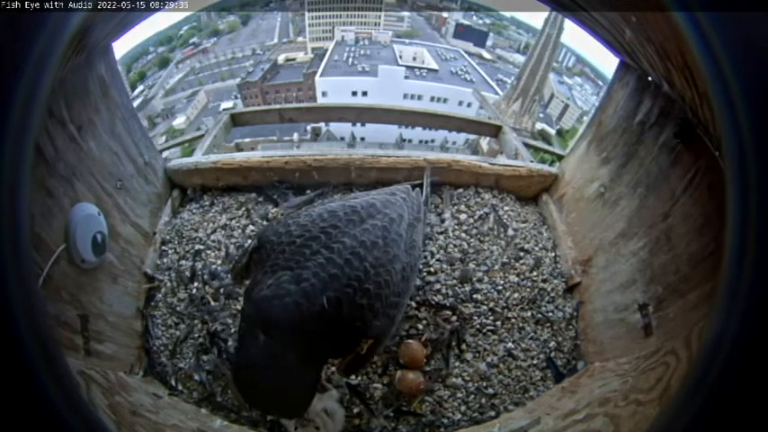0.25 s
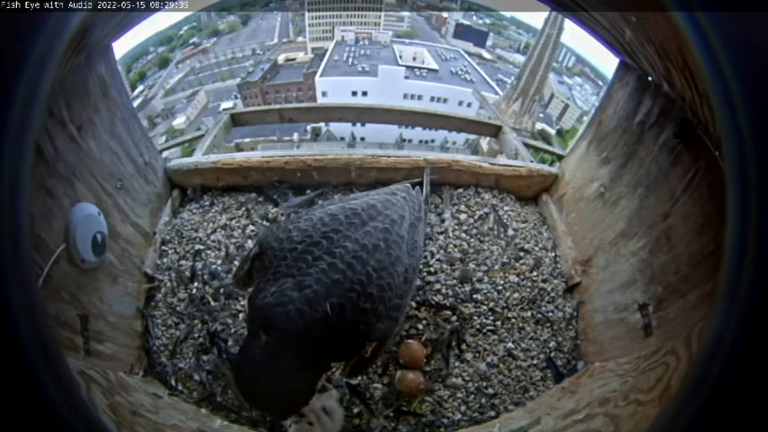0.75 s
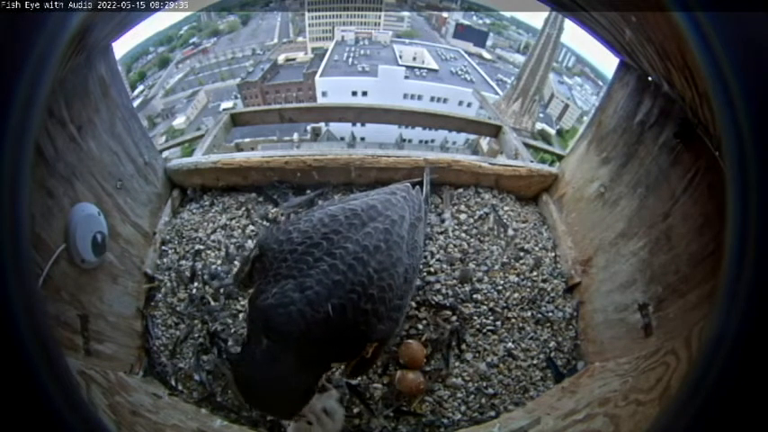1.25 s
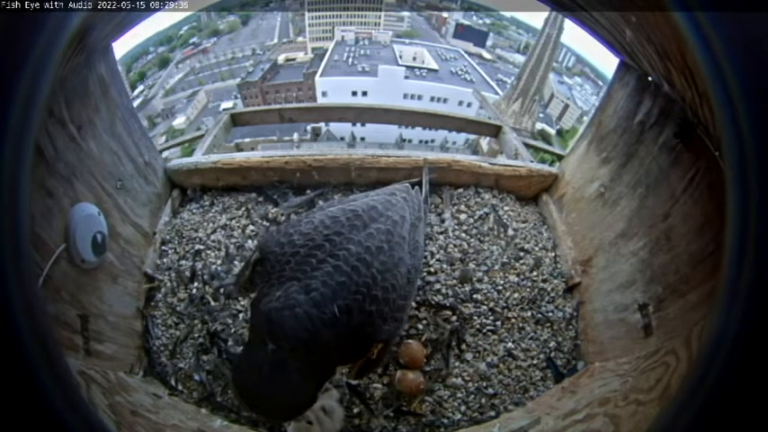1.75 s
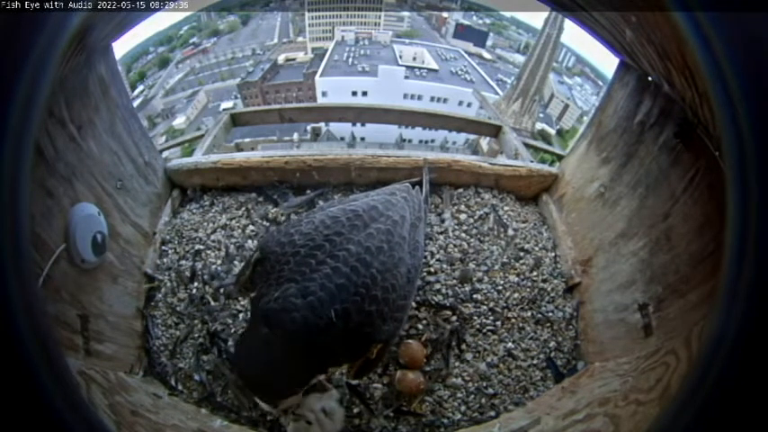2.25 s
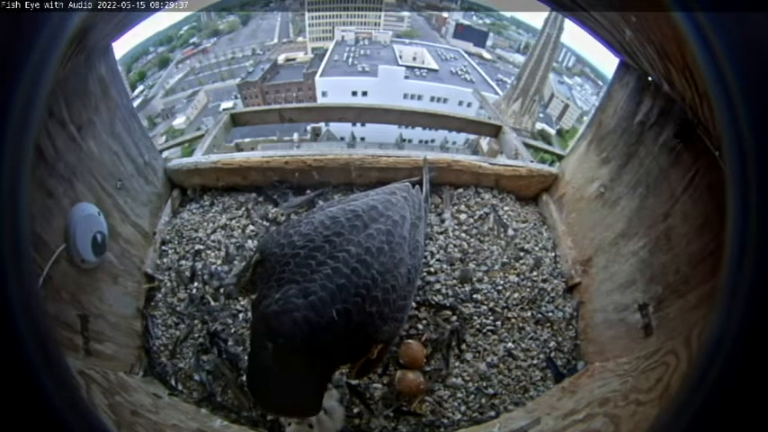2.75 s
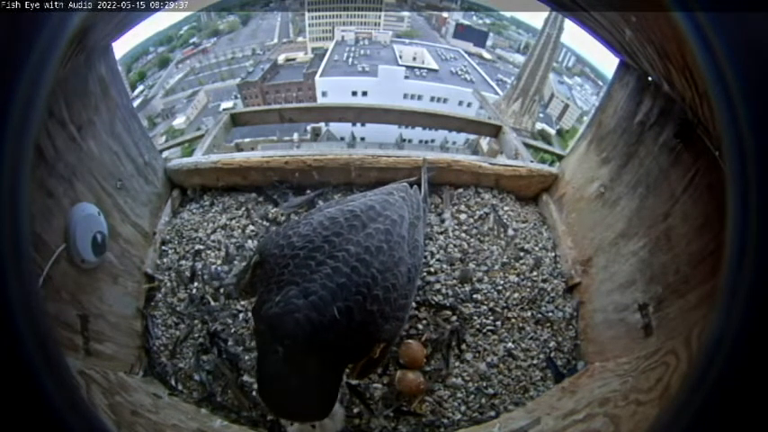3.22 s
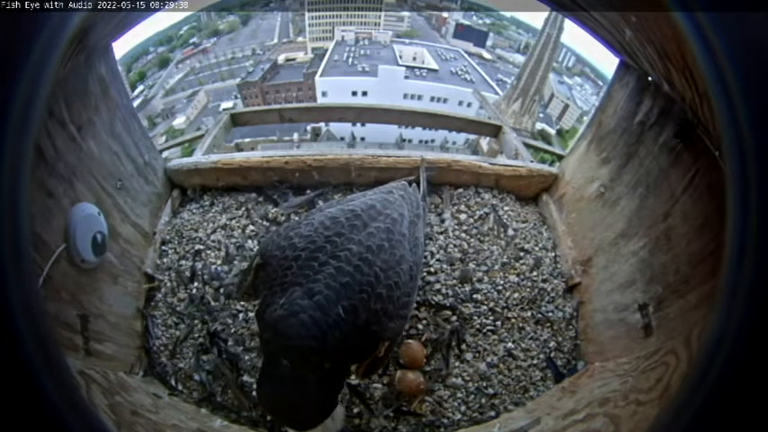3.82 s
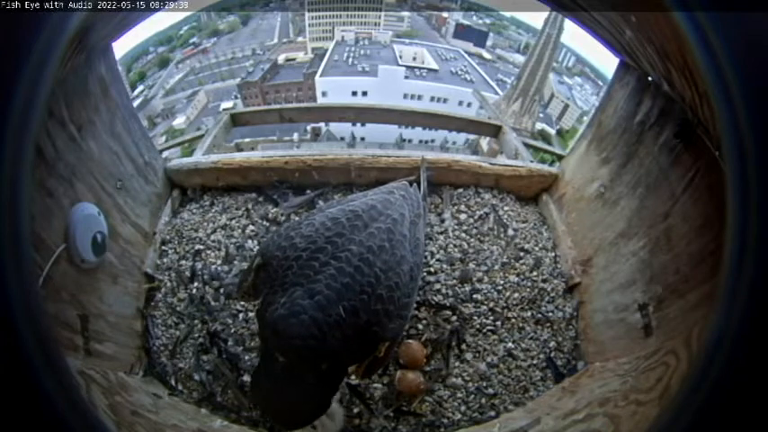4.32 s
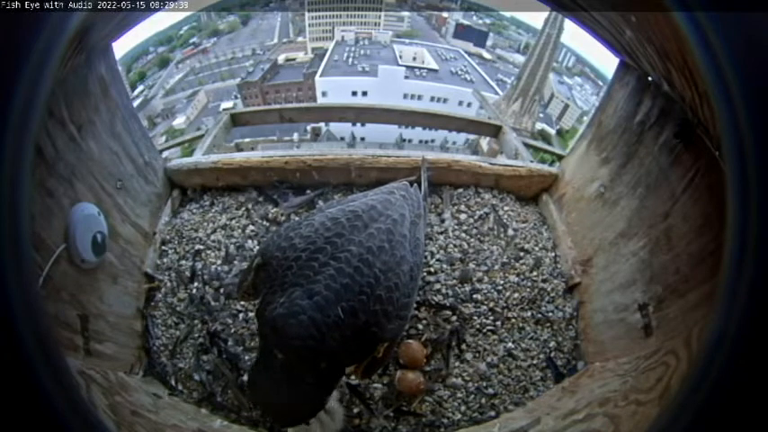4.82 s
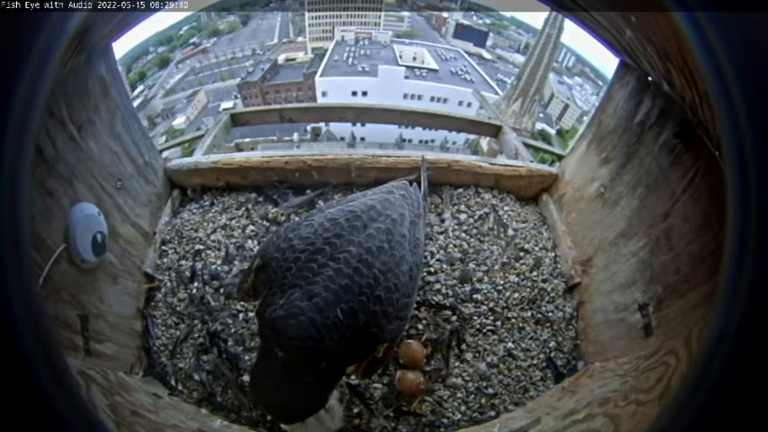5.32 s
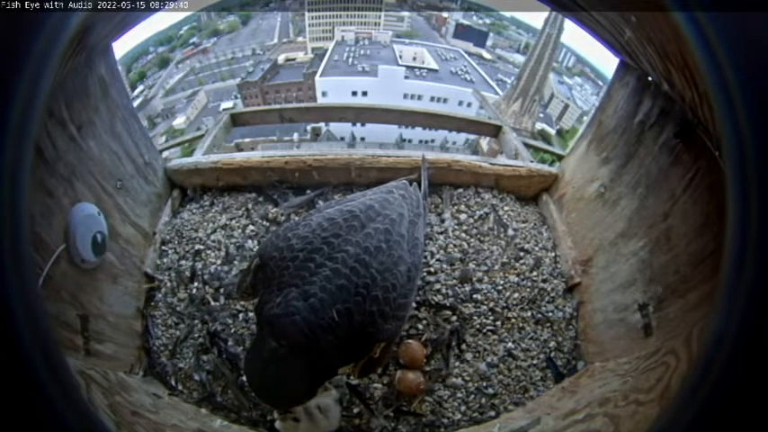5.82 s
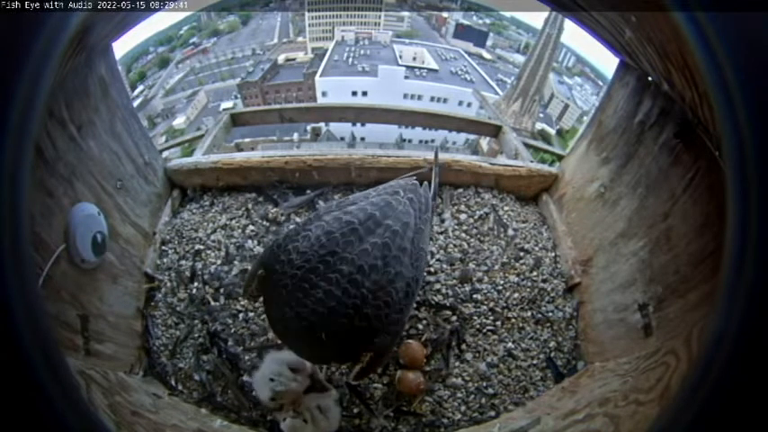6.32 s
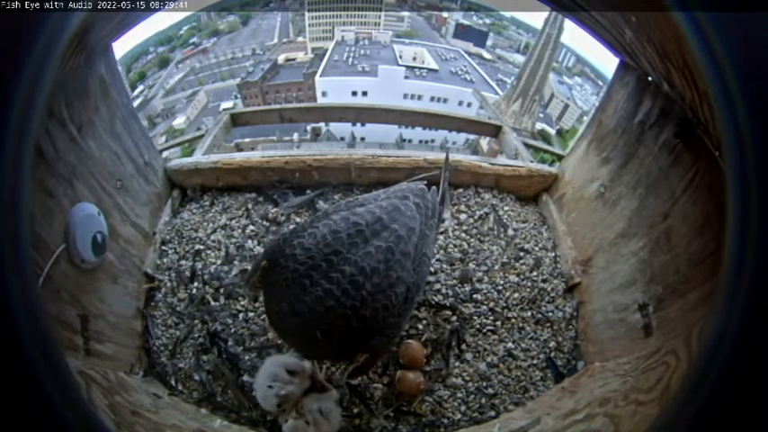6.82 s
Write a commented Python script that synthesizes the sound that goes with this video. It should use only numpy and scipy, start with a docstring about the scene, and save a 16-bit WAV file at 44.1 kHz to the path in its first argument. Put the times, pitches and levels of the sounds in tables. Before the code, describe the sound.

Falcon chicks whine and squeal thinly in a wooden nest box over a low city rumble, with a few clicks on gravel.

```python
"""Falcon chicks beg under a parent in a wooden, gravel-floored nest box on a roof.
Each cry is a reedy syrinx tone: thin whines glide, quiver and break into squeals, rasping under strain.
A second voice cuts in with a croak and later a screech. Beak and claws click on the gravel and knock
the floor, and the plywood walls add a short ring. Behind it all, a bed of city rumble and ventilation
hum comes through the opening."""
import sys
import numpy as np
from scipy import signal
from scipy.fft import rfft, irfft, next_fast_len
from scipy.io import wavfile
from scipy.ndimage import map_coordinates

SR = 44100
rng = np.random.default_rng(int(sys.argv[2]) if len(sys.argv) > 2 else 0)


def bounce(signal):
    """Save signal as a 16-bit WAV file at the path given by the first command-line argument."""
    frames = np.transpose(np.atleast_2d(signal))
    limited = np.clip(frames, -1, 1)
    pcm = np.round(limited * 32767).astype(np.int16)
    wavfile.write(sys.argv[1], SR, pcm)


N = 311346
TIME = np.arange(N) / SR

# six whines, a long swooping squeal, then the second voice's croak and screech:
# (start [s], end [s], fundamental [dB], overtones [dB], flat start [share of pitch], closing fall [s])
CRIES = [(1.299, 2.444, -54, -72.5, 0.06, 0.06), (2.78, 2.88, -55.5, -73.5, 0.12, 0.0),
         (3.04, 3.806, -49, -68, 0.24, 0.025), (3.889, 4.094, -46, -57, 0.0017, 0.0),
         (4.121, 4.737, -50, -63.5, 0.16, 0.0), (5.07, 5.82, -49, -62, 0.35, 0.0),
         (5.961, 7.06, -48, -61, 0.16, 0.0), (4.406, 4.602, -52.0, -57, 0.0059, 0.0),
         (5.998, 6.089, -44, -61, 0.05, 0.0)]
# the pitch line each cry aims at, one list per cry: (time [s], pitch [Hz])
PITCH_LINES = [
    [(1.42, 1535), (1.51, 1485), (1.62, 1690), (1.82, 1895), (1.88, 1878), (2.04, 2022), (2.29, 1975),
     (2.38, 2025)],
    [(2.8, 1890), (2.846, 1990), (2.88, 1920)],
    [(3.11, 1990), (3.22, 1946), (3.3, 1972), (3.55, 2008), (3.7, 1987), (3.78, 1945)],
    [(3.887, 1720), (3.915, 1664), (3.935, 1710), (3.955, 1650), (3.994, 1770), (4.042, 1733),
     (4.058, 1640), (4.08, 1680), (4.092, 1600)],
    [(4.145, 1810), (4.179, 1895), (4.201, 1705), (4.23, 1675), (4.25, 1745), (4.51, 1795), (4.55, 1745),
     (4.67, 1734), (4.704, 1635), (4.734, 1725)],
    [(5.17, 1755), (5.196, 1685), (5.22, 1740), (5.38, 1795), (5.43, 1872), (5.58, 1895), (5.666, 1800),
     (5.71, 1830), (5.82, 1812)],
    [(5.96, 2020), (6.033, 2235), (6.084, 2230), (6.115, 1985), (6.19, 1985), (6.245, 1925), (6.284, 2066),
     (6.346, 1890), (6.385, 1520), (6.412, 1735), (6.435, 1660), (6.49, 2035), (6.53, 2040), (6.58, 1770),
     (6.632, 1660), (6.651, 1762), (6.682, 1370), (6.71, 1730), (6.744, 1915), (6.806, 1535), (6.891, 1425),
     (6.904, 1255), (6.965, 1225), (6.995, 1665), (7.023, 1841), (7.06, 1760)],
    [(4.405, 1277), (4.424, 1150), (4.447, 1250), (4.47, 1125), (4.497, 1210), (4.516, 1373), (4.565, 1434)],
    [(6.023, 2470), (6.075, 2400)],
]
# spells in which the voice is pressed harder or cracks:
# (time [s], half length [s], fundamental [dB], overtones [dB], hoarseness [0-1])
STRAINS = [(1.345, 0.016, 8.5, 1, 0.06), (1.44, 0.13, -4.0, -14, 0.5), (1.87, 0.05, -12.0, -7, 0.3),
           (2.85, 0.027, 1, 6, 0.5), (3.06, 0.02, -11, 0, 0.4), (3.21, 0.05, -3.0, -2.0, 0.1),
           (4.02, 0.049, -1.5, 7.5, 0), (4.18, 0.035, -3.5, 8.5, 0.6), (4.5, 0.037, -1.5, 9, 0.35),
           (4.7, 0.05, 2.5, 1, 0.1), (5.09, 0.021, -14, 2, 0.9), (5.16, 0.037, -1.5, 14, 0.2),
           (5.5, 0.079, -5, -4.0, 0.1), (5.79, 0.074, 4, 8.5, 0.03), (6.05, 0.09, -7, 12, 0.3),
           (6.29, 0.033, -3, -2, 0.5), (6.36, 0.029, -3.5, -24, 0.02), (6.42, 0.021, -1, 12, 0.1),
           (6.68, 0.041, -0.5, 14.5, 0.35), (6.92, 0.05, -11, 14.0, 0.37)]
# balance of the voice's partials 2 to 5: (level [dB])
OVERTONE_TRIMS = [0.5, -4.5, -12.5, -26.5]
# throat and box resonances, lighting up each partial that glides through: (frequency [Hz], gain [dB])
THROAT_EQ = [(1200.0, 8.5), (1520.0, -4.5), (1670.0, 6), (1780.0, 4.5), (1880.0, -6.5), (2000.0, -3.0),
             (2350.0, -10), (3050.0, -5.5), (3500.0, -11.5), (4000.0, 0.5), (4450.0, 5), (4800.0, 4.0),
             (5100.0, 3), (5500.0, -1.0), (6000.0, 10.5), (6700.0, 4.5), (7400.0, -1.0)]
# beak and claws on gravel: (time [s], level [dB], floor knock [dB], mids [dB], contact hardness [Hz])
CLICKS = [(.2552, -42.5, 6, 13, 700), (.2838, -38.5, -6, 6.5, 900), (.428, -28.5, 4, -1.5, 372),
          (.672, -41, 5, -1, 550), (.7168, -39.5, -21, -3, 895), (.736, -39.5, -20, -9, 900),
          (.755, -42, -14, 4, 900), (0.7955, -12, -15.5, 0, 1500), (.8435, -42.5, -21, 16.5, 900),
          (1.2416, -42.5, -22, -14, 894), (1.3558, -42.5, -16, -4, 900), (1.381, -45, -6, 3, 900),
          (2.869, -51, -14, 5, 900), (4.9312, -39, -9, -13, 920), (5.3887, -39, -13, 3, 900),
          (5.412, -40.5, -23, 4, 900), (5.4296, -34, -18, 4.5, 900), (5.8536, -51, -19, 8, 875),
          (6.94, -51, -25, -8, 900)]
# tone colour of a struck pebble: (frequency [Hz], level [dB])
PEBBLE_SPECTRUM = [(600, -27.5), (1200, -13.5), (1650, -7), (2000, -13.5), (2250, -6.5), (2700, -14),
                   (3900, -15.5), (4700, -3.5), (5250, -11), (6100, -1.5), (6850, 0), (7500, -5),
                   (9000, -15), (12000, -83)]
# modes of the wooden floor: (frequency [Hz], level [dB], t60 [s])
FLOOR_MODES = [(257, -1, 0.012), (377, 2.5, 0.068), (524, -4.5, 0.063), (711, 7, 0.031), (784, 5, 0.036),
               (972, 1, 0.031), (1290, -8.5, 0.024)]
# ring time of the plywood walls: (frequency [Hz], t60 [s])
WALL_DECAY = [(200, 0.071), (2000, 0.09), (8000, 0.06)]
# low end of the traffic: (frequency [Hz], level [dB])
RUMBLE_SPECTRUM = [(15, -10.5), (28, -6.5), (45, -2.5), (65, 1.5), (113, -2), (150, -4), (180, -10.5),
                   (240, -7.5), (272, -26), (320, -28), (375, -20.5), (430, -30.5), (550, -64), (900, -120)]
# airy wash of the city: (frequency [Hz], level [dB])
WASH_SPECTRUM = [(180, -32), (300, -3.5), (327, -11), (366, -12.5), (441, -11.5), (638, -14.5), (778, -8),
                 (1060, -4), (1700, -17.5), (1830, -12.5), (1940, -16.5), (2200, -16.5), (2610, -23),
                 (6400, -31), (9000, -38), (11700, -98.5), (19800, -120)]
# the far engine works harder: (time [s], half length [s], boost [dB], speed change [share])
ENGINE_SURGES = [(.15, 0.36, 14, -0.012), (.85, 0.32, 14, -0.017), (5.3, 0.175, 11.5, 0.0536)]
# hum lines of the roof fans: (frequency [Hz], level [dB], width [Hz])
FAN_LINES = [(214, -61, 30), (254.5, -62, 8), (297.2, -65.5, 4), (379.8, -67.5, 15), (596.4, -74, 4),
             (896, -67, 4), (1160, -69.5, 25)]
# treble roll-off of the microphone: (frequency [Hz], gain [dB])
MICROPHONE_EQ = [(7250, -0.5), (7550, -9.5), (7850, -20.5), (9000, -18)]


def chicks(voice_db=-1):
    """The begging voices: every cry sung on its own pitch line."""
    out = np.zeros(N)
    for (start, end, tone_db, overtones_db, scoop, fall_s), line in zip(CRIES, PITCH_LINES):
        t = np.arange(start, end, 1 / SR)
        add(out, start, cry(t, glide(t, line, scoop, fall_s), tone_db, overtones_db))
    return amp(voice_db) * out


def cry(t, pitch, tone_db, overtones_db, waver=.004, clear_jitter=.0029, hoarse_jitter=.014,
        clear_rasp=.089, hoarse_rasp=1.05, shimmer_db=1.88, flutter_db=1.5, fade_s=.0035):
    """One side of a syrinx: a reedy, slightly wavering tone that turns bright or raspy under strain."""
    press_db, bright_db, hoarse = swells(STRAINS, t)
    jitter = clear_jitter + hoarse_jitter * hoarse
    rasp = clear_rasp + hoarse_rasp * hoarse
    pitch = pitch * (1 + waver * wobble(70, t))
    phase = 2 * np.pi * np.cumsum(pitch * (1 + jitter * wobble(600, t))) / SR
    partials_db = [tone_db + press_db] + [overtones_db + bright_db + db for db in OVERTONE_TRIMS]
    tone = np.zeros(len(t))
    for k, db in enumerate(partials_db, 1):
        # turbulence spreads a skirt of noise around each partial
        skirt = rasp * complex_wobble(900, t) / np.sqrt(2)
        gain = amp(db + along(THROAT_EQ, k * pitch) + shimmer_db * wobble(90.3, t))
        tone += gain * np.imag((1 + skirt) * np.exp(1j * k * phase))
    flutter = amp(flutter_db * wobble(22, t))
    fades = np.clip(np.minimum(t - t[0], t[-1] - t) / fade_s, 0, 1)
    return np.sqrt(2) * tone * flutter * fades


def glide(t, line, scoop, fall_s, scoop_s=.025, fall_share=.22):
    """A cry scoops up to its pitch line, rides it and may sag as it runs out of air."""
    flat = scoop * np.exp(-(t - t[0]) / scoop_s)
    sag = fall_share * np.clip(1 - (t[-1] - t) / max(fall_s, 1 / SR), 0, 1)
    aim_hz = np.interp(t, *np.transpose(line))
    return aim_hz * (1 - flat - sag + quiver(t))


def quiver(t, start=4.235, end=4.69, crest_s=4.26, rate_hz=19.4, depth=.018):
    """A spell of fast vibrato shakes one whine and the croak that overlaps it."""
    return depth * np.cos(2 * np.pi * rate_hz * (t - crest_s)) * (t > start) * (t < end)


def gravel(echo_s=.0035, echo_db=-7):
    """Each contact cracks on a pebble and knocks the floor; the nearest wall slaps the crack back."""
    out, t = np.zeros(N), np.arange(SR // 6) / SR
    for s, db, knock_db, mids_db, hardness_hz in CLICKS:
        crack = pebble_crack(t, mids_db)
        knock = amp(knock_db) * floor_knock(t, hardness_hz)
        add(out, s, amp(db) * (crack + knock))
        add(out, s + echo_s, amp(db + echo_db) * crack)
    return out


def pebble_crack(t, mids_db, mids_hz=2500, bright_hz=5000, strike_db=-2, attack_s=.00046,
                 crack_db=-8, crack_t60=.014, ring_db=-18, ring_t60=.037):
    """A struck pebble gives a sharp transient, then grinds briefly on its neighbours."""
    def shelf(hz):
        return amp(along([(mids_hz, mids_db), (bright_hz, 0)], hz))

    attack = 1 - np.exp(-t / attack_s)
    decay = amp(crack_db - 60 * t / crack_t60) + amp(ring_db - 60 * t / ring_t60)
    crack = attack * decay * filtered(noise(PEBBLE_SPECTRUM, len(t)), shelf)
    strike = impulse(lambda hz: shelf(hz) * amp(along(PEBBLE_SPECTRUM, hz)))
    add(crack, 0, amp(strike_db) * strike)
    return crack


def floor_knock(t, hardness_hz):
    """The wooden floor rings in damped modes; a soft contact wakes only the low ones."""
    knock = np.zeros(len(t))
    for k, (hz, db, t60) in enumerate(FLOOR_MODES):
        mode = amp(db - 60 * t / t60) * np.sin(2 * np.pi * hz * t)
        softening = np.hypot(1, (hz / hardness_hz) ** 3)
        knock += (-1) ** k * mode / softening  # neighbouring modes start in opposite directions
    return knock / 2


def wall_ring(x):
    """The plywood walls add a tight reverb that hangs longest in the mids."""
    hz, t, bands = signal.stft(rng.standard_normal(SR // 6), SR, nperseg=128)
    decay = amp(-60 * t / along(WALL_DECAY, hz)[:, None])
    tail = signal.istft(bands * decay, SR, nperseg=128)[1]
    return signal.fftconvolve(x, tail / np.linalg.norm(tail))[:N]


def traffic(rumble_db=-42.5, wash_db=-52, swell_s=.4, swell_half_s=.8, swell_db=3):
    """Street noise: a low rumble that swells once, under an almost steady wash."""
    passing_db, = swells([(swell_s, swell_half_s, swell_db)], TIME)
    rumble = amp(rumble_db + passing_db) * noise(RUMBLE_SPECTRUM, N)
    wash = amp(wash_db + .12 * wobble(3, TIME)) * noise(WASH_SPECTRUM, N)
    return rumble + wash


def engine(idle_db=-55, idle_hz=104.1, drift=.015, flutter_db=3.1):
    """A far engine drones on one unsteady tone, swelling and bending as it works harder."""
    surge_db, speed_change = swells(ENGINE_SURGES, TIME)
    pitch = idle_hz * (1 + speed_change + drift * wobble(8, TIME))
    phase = 2 * np.pi * np.cumsum(pitch) / SR
    return amp(idle_db + surge_db + flutter_db * wobble(5.6, TIME)) * np.sqrt(2) * np.sin(phase)


def roof_fans():
    """Ventilation hum: narrow lines that wander in level and phase."""
    hum = np.zeros(N)
    for hz, db, width_hz in FAN_LINES:
        line = complex_wobble(width_hz, TIME) * np.exp(2j * np.pi * hz * TIME)
        hum += amp(db) * unit(line.real)
    return hum


def amp(db):
    """Decibels to gain."""
    return 10 ** (np.asarray(db) / 20)


def unit(x):
    """x at rms 1."""
    return x / np.sqrt(np.mean(x ** 2) + 1e-20)


def along(points, hz):
    """Read (frequency [Hz], value) breakpoints on a log frequency axis."""
    freqs, values = np.transpose(points)
    return np.interp(np.log(hz + 1), np.log(freqs + 1), values)


def swells(rows, t):
    """Bell-shaped envelopes from (time [s], half length [s], amounts...), one sum per amount."""
    return sum(np.outer(amounts, np.exp(-((t - s) / half) ** 2)) for s, half, *amounts in rows)


def wobble(rate, t):
    """A smooth random modulator with rate knots a second."""
    at = (t - t[0]) * rate
    return map_coordinates(rng.standard_normal(int(at[-1]) + 4), [at], mode="mirror")


def complex_wobble(rate, t):
    """A random modulator of both level and phase."""
    return wobble(rate, t) + 1j * wobble(rate, t)


def filtered(x, response):
    """EQ x with a gain curve over frequency."""
    size = next_fast_len(len(x) + 8192)
    return irfft(rfft(x, size) * response(np.fft.rfftfreq(size, 1 / SR)), size)[:len(x)]


def noise(spectrum, size):
    """Coloured noise of rms 1."""
    return unit(filtered(rng.standard_normal(size), lambda hz: amp(along(spectrum, hz))))


def impulse(gain, size=1024):
    """The minimum-phase click, of peak 1, of a body with this gain over frequency."""
    cepstrum = irfft(np.log(gain(np.fft.rfftfreq(size, 1 / SR)) + 1e-6))
    response = irfft(np.exp(rfft(2 * cepstrum[:size // 2], size)))
    return response / np.abs(response).max()


def add(track, s, sound):
    """Mix a sound into the track from second s on."""
    part = track[max(round(s * SR), 0):][:len(sound)]
    part += sound[:len(part)]


def scene(voice_send_db=-17, click_send_db=-11):
    """The mono mix: birds and gravel up close in the ringing box, the city bed outside."""
    voices, clicks = chicks(), gravel()
    walls = amp(voice_send_db) * wall_ring(voices) + amp(click_send_db) * wall_ring(clicks)
    city = traffic() + engine() + roof_fans()
    return (voices + clicks + walls + city)[None]


def record(dry, cutoff_hz=9168, dc_offset=.0088):
    """The nest camera's microphone passes little treble, and its converter rests slightly off zero."""
    dulled = filtered(dry[0], lambda hz: amp(along(MICROPHONE_EQ, hz)) * (hz < cutoff_hz))
    return dc_offset + dulled[None]


dry = scene()
out = record(dry)
bounce(out)
```